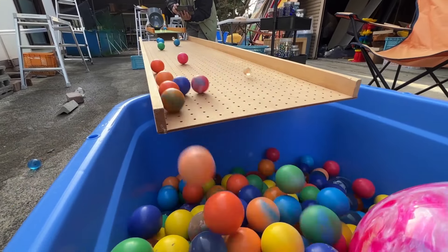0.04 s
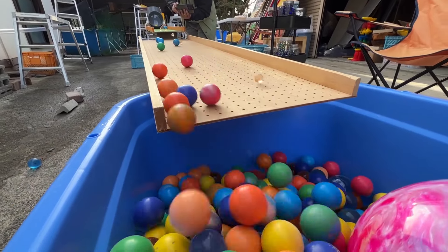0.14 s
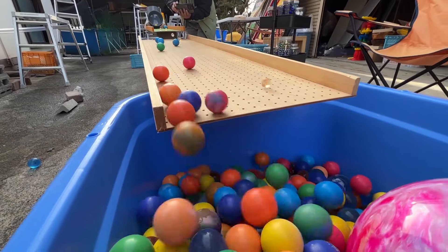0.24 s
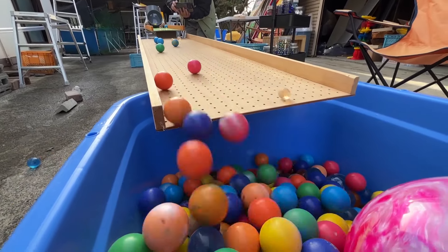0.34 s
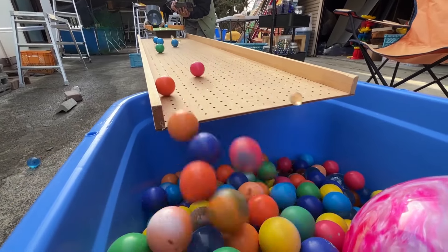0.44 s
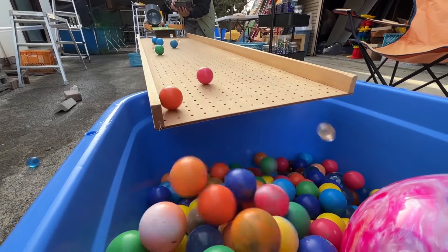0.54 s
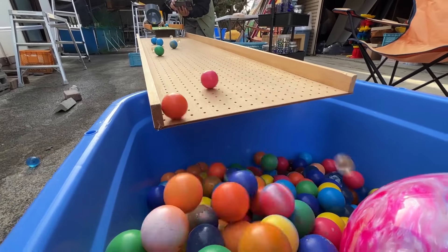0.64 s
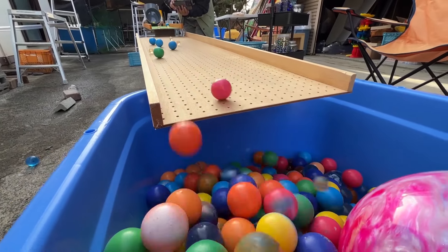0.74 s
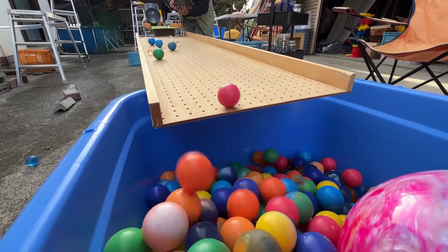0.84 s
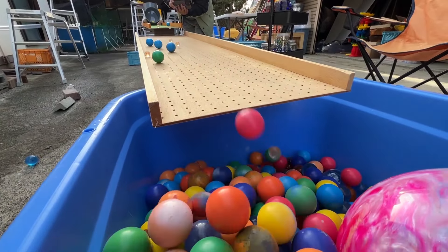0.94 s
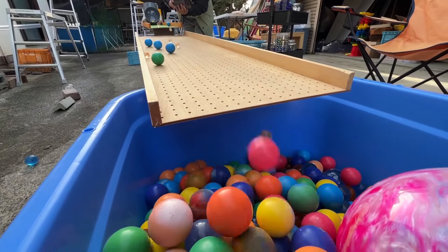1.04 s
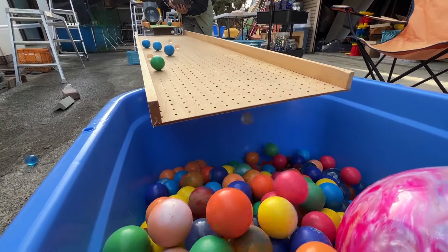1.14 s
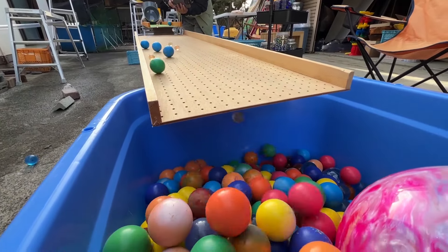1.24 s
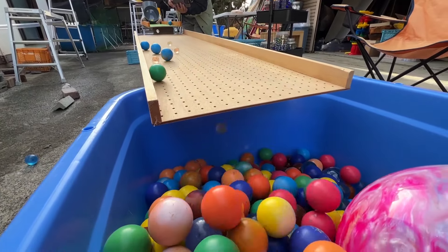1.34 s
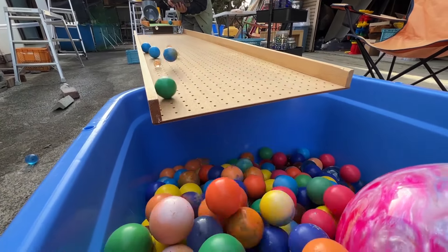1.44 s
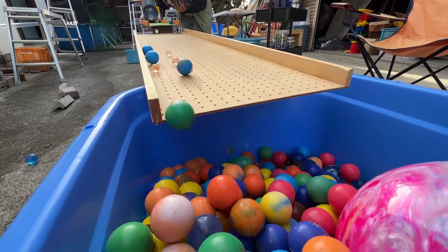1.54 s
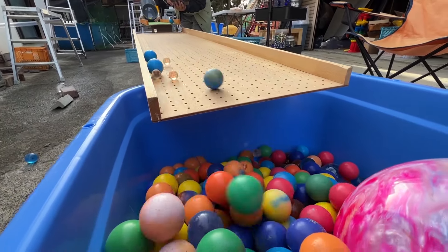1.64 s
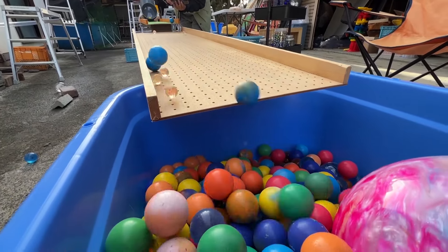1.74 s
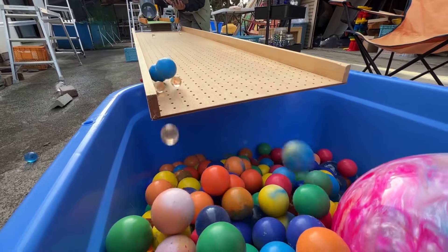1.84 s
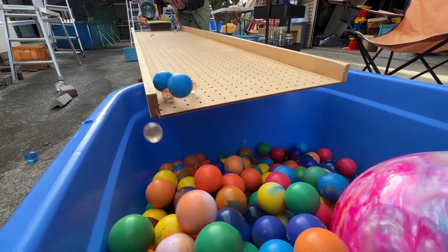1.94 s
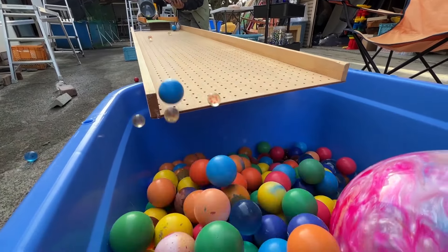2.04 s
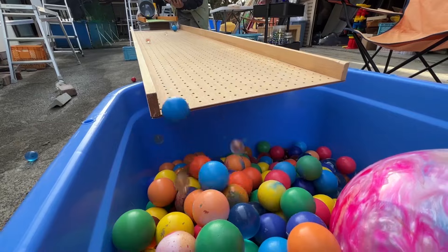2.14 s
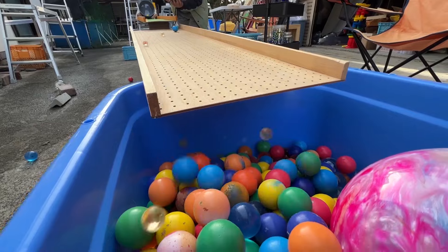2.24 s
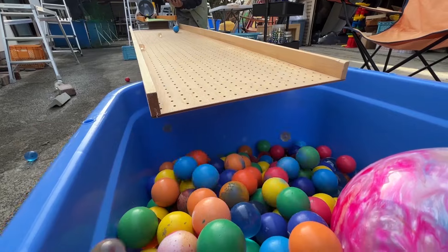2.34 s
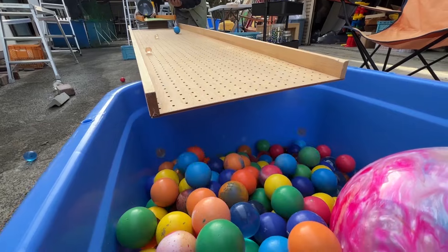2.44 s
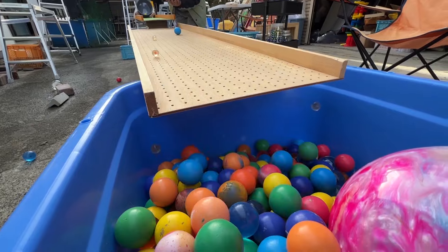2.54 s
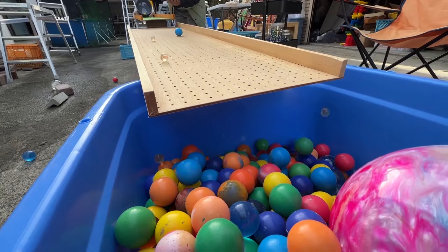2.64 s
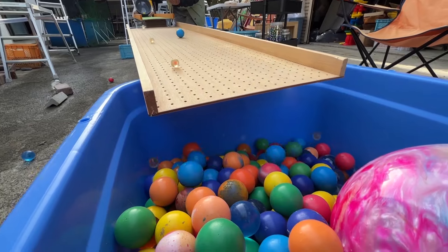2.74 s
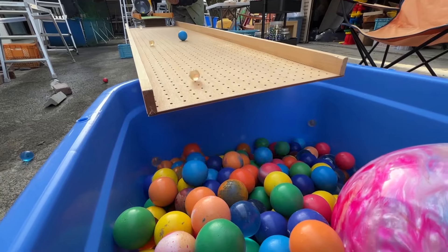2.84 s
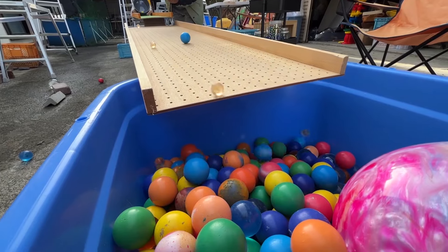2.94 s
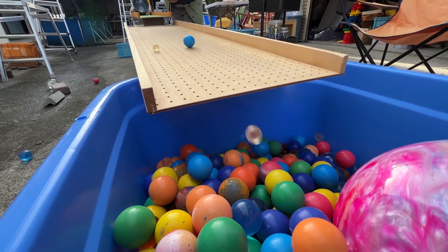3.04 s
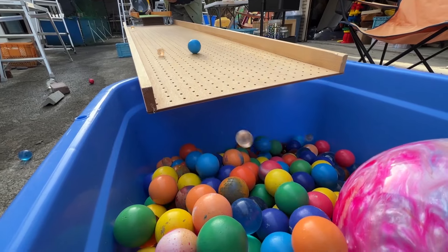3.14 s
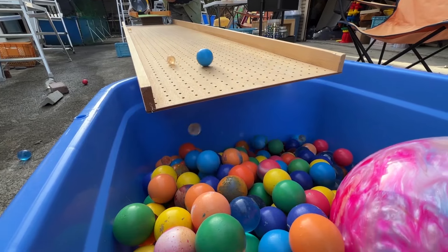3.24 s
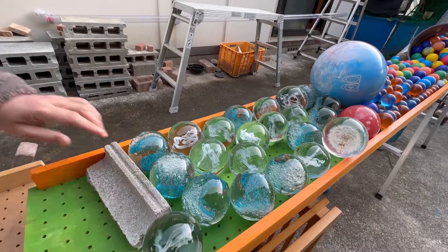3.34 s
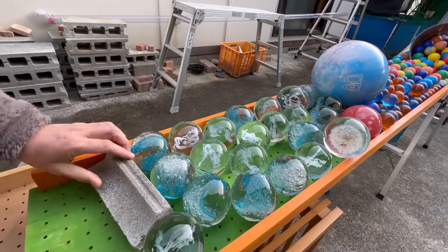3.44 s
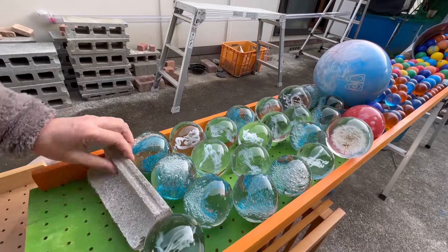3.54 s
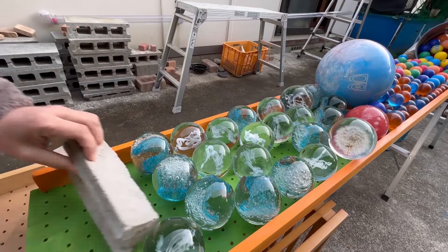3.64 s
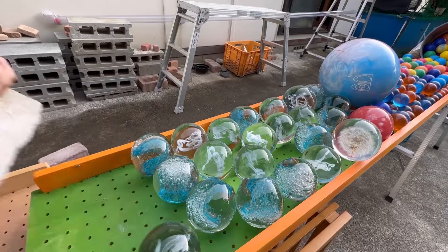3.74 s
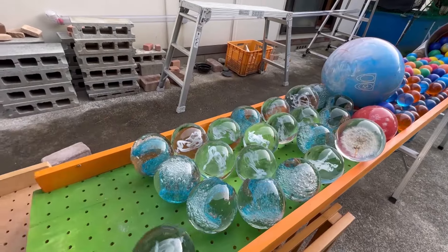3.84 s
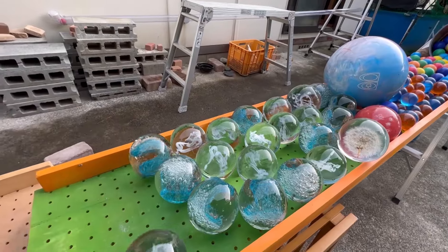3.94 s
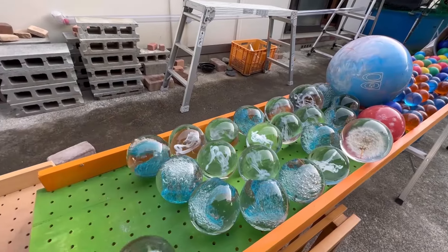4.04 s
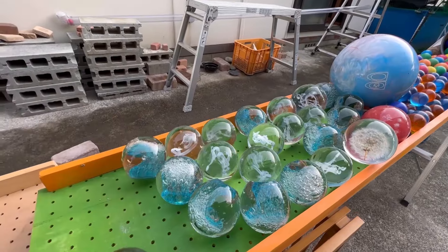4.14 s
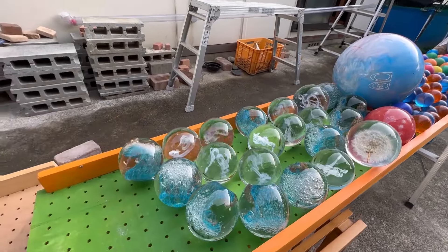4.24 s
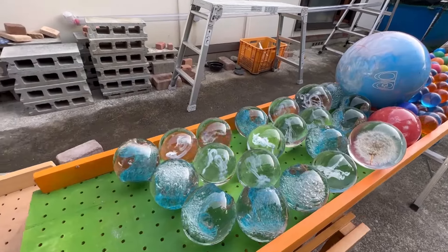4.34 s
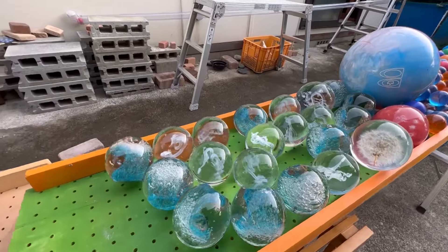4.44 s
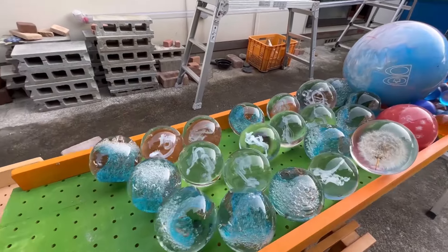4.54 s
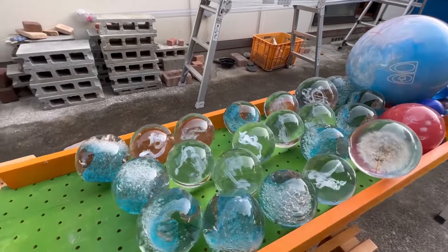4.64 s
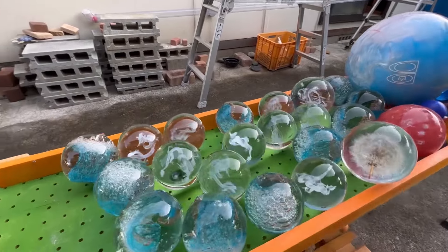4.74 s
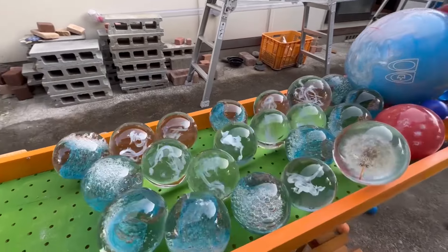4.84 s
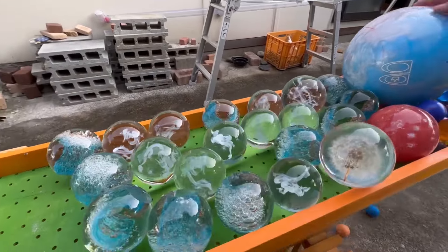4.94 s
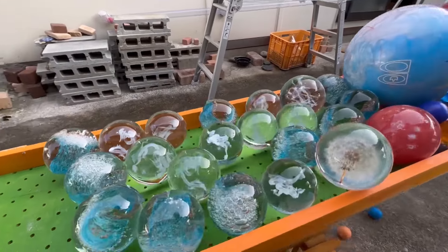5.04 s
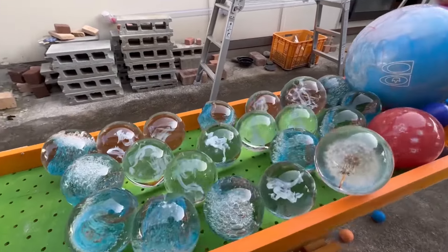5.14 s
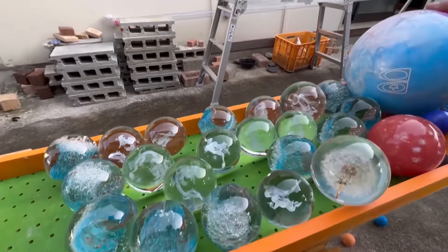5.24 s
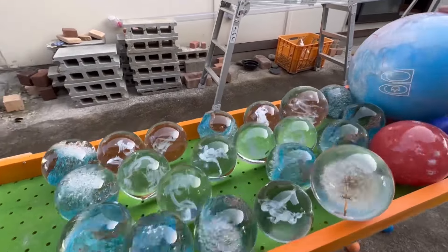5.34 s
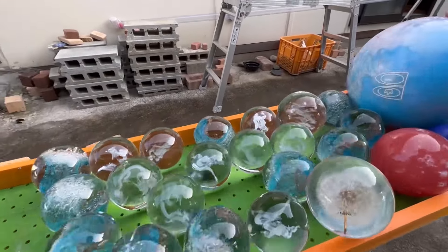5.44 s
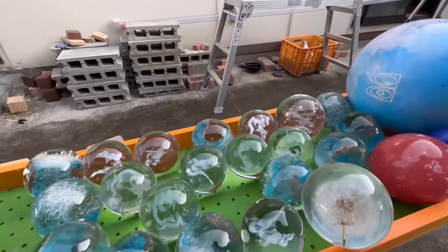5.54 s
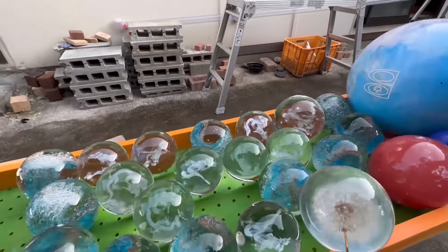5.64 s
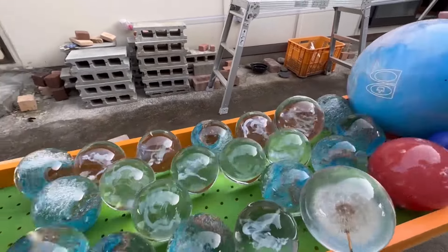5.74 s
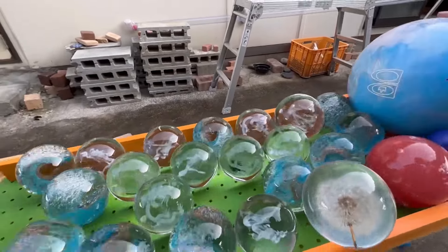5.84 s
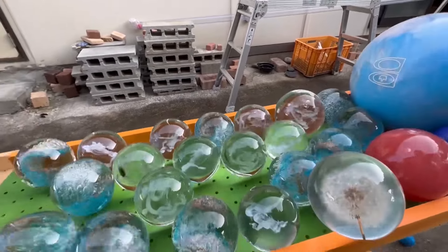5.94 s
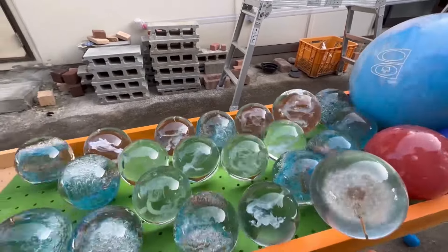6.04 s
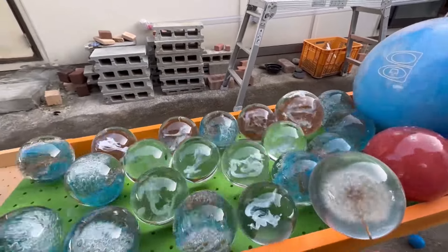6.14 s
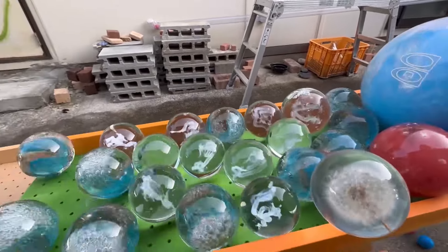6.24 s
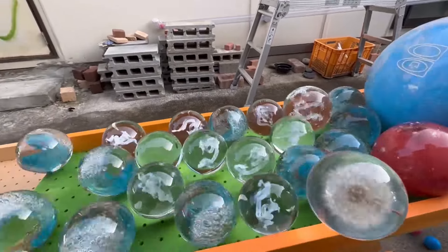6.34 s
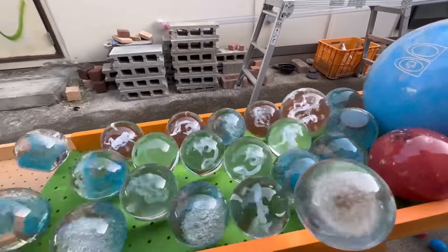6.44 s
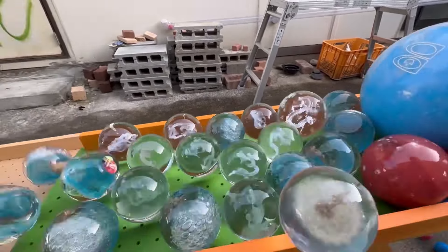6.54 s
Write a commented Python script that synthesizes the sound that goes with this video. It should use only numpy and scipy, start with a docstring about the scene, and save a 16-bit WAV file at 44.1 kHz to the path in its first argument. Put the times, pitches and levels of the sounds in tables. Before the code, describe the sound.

Close stereo microphone in an open yard. First, dense but muffled slow-motion knocks of balls falling into a plastic tub, with bassy handling rumble, thinning to separate duller clicks and thuds. Then a sudden change to a bright close view: a block drags and snaps away, glass squeaks briefly, a heavy thump follows, and glass balls clack and roll ever more densely.

```python
"""Hard balls knock together as they roll off a pegboard ramp and drop onto a heap in a plastic tub outdoors,
first strongly slowed down and dark, then less so; after a cut, close to the ramp, a block is pulled away and
heavy glass balls creak, knock, scuff and start to roll. Knocks, thuds and bright cracks are random contacts
through resonances; rolling is a rattle of pitched taps over a board drone and scuffing noise. Scrapes and
squeaks are dense slips that sing, and the microphone's shaking is low noise."""
import sys
import numpy as np
from scipy import signal
from scipy.fft import rfft, irfft, next_fast_len
from scipy.io import wavfile
from scipy.ndimage import uniform_filter1d

SR = 44100
rng = np.random.default_rng(int(sys.argv[2]) if len(sys.argv) > 2 else 0)


def master(y):
    """Save y as 16-bit WAV."""
    cut = np.clip(np.atleast_2d(y).T, -1, 1)
    pcm = np.round(cut * 32767)  # scale
    wavfile.write(sys.argv[1], SR, pcm.astype(np.int16))


def natural_amplitude(level_db):
    """Convert a level in decibels to a linear amplitude factor, elementwise."""
    exponent = np.asarray(level_db, float) / 20
    return 10 ** exponent


N = 290178
T = np.arange(N) / SR
CUTS_S = [1.43, 3.385]   # the two borders between the three parts
FROM_LEFT_S = (3.5, 5.5)   # sounds placed in time reach the left ear first between these times
EAR_LAG_S, WALL_LAG_S = 0.00045, 0.00018   # delay to the far ear: for the balls, for board and tub


def rms_one(x):
    """Scales a sound to rms 1."""
    return x / np.sqrt(np.mean(x ** 2) + 1e-20)


def peak_one(x):
    """Scales each side so that its loudest 3 ms reach rms 1."""
    power = uniform_filter1d(x ** 2, size=130)
    return x / np.sqrt(np.max(power, axis=-1, keepdims=True) + 1e-20)


def in_time(rows):
    """Draws straight lines between the rows of a table, giving each column sample by sample."""
    s, *columns = np.transpose(rows)
    return [np.interp(T, s, c) for c in columns]


def of_part(values, s):
    """Picks the value that holds in the part where time s lies."""
    return np.array(values)[np.searchsorted(CUTS_S, s)]


def panned(db):
    """Turns a left-right level difference into left and right gains."""
    return natural_amplitude(np.outer([.5, -.5], db))


def coloured(x, spectrum):
    """Filters x with a smooth curve over frequency, then scales it to rms 1."""
    size = next_fast_len(N)
    hz, db = np.transpose(spectrum)
    log_hz = np.log(np.arange(size // 2 + 1) * SR / size + 1)
    gain = natural_amplitude(np.interp(log_hz, np.log(hz + 1), db))
    return rms_one(irfft(rfft(x, size) * gain, size)[..., :N])


def by_part(x, spectra):
    """Gives each of the three parts its own colour."""
    part = np.searchsorted(CUTS_S, T)
    return sum((part == k) * coloured(x, spectrum) for k, spectrum in enumerate(spectra))


def drift(rate_hz):
    """Makes a slow random wander of rms 1 by smoothing noise."""
    r = np.exp(-2 * np.pi * rate_hz / SR)
    noise = rng.standard_normal(N + SR)
    return rms_one(signal.lfilter([1], [1, -2 * r, r * r], noise)[SR:])   # drops the first second


def grains(shape, s, per_s, spread_db, alike, first=0., lag_s=EAR_LAG_S):
    """Random contacts, a firm one first if asked; the far ear hears a share of the near one's a little later."""
    size = natural_amplitude(spread_db * np.minimum(rng.exponential(1, (2, *shape)), 5))
    sign = rng.choice([-1, 1], size.shape)
    near, other = size * sign * (rng.random(size.shape) < per_s / SR)
    alike = np.clip(alike, 0, 1)
    lag = round(lag_s * SR)
    far = np.sqrt(alike) * np.roll(near, lag, axis=-1) + np.sqrt(1 - alike) * other
    start = round(.002 * SR)
    near[..., start] += first
    far[..., start + lag] += first
    from_left = (s > FROM_LEFT_S[0]) & (s < FROM_LEFT_S[1])
    return np.stack([np.where(from_left, near, far), np.where(from_left, far, near)], axis=-2)


def resonance(x, hz, width):
    """Rings at one pitch: a two-pole band with gain 1 on top."""
    r = np.exp(-np.pi * width / SR)
    return signal.lfilter([1 - r, 0, r - 1], [1, -2 * r * np.cos(2 * np.pi * hz / SR), r * r], x)


def blow(t60, rise_s, tail_db, stretch, count):
    """Envelope of a blow: quick rise, decay, and a longer tail from the yard and the jostled heap."""
    t, t60 = np.arange(count) / SR, max(t60, .005)
    decay = natural_amplitude(-60 * t / t60)
    tail = natural_amplitude(tail_db - 60 * t / (t60 * stretch))
    return (1 - np.exp(-t / rise_s)) * (decay + tail)


def held(s, length, rise_s, fall_s):
    """Envelope that rises from time s, stays up until its length is over and dies away."""
    rise = np.clip((T - s) / max(rise_s, .001), 0, 1)
    return rise * np.exp(-np.maximum(T - s - length, 0) / max(fall_s, .001))


def add(out, s, piece):
    """Mixes a piece in at time s."""
    i = max(round(s * SR), 0)
    out[:, i:i + piece.shape[1]] += piece[:, :N - i]


# low shaking of the microphone: (time [s], level [dB])
SHAKING = [(0, -34), (1.3, -44), (2.3, -45.5), (2.5, -73), (3.36, -58), (3.39, -32), (3.7, -36.5),
           (4.0, -45.5), (4.75, -48.5), (5.1, -38), (6.0, -49.5), (6.58, -54)]
# jolts on top of it: (time [s], level [dB])
JOLTS = [(.03, -42), (.16, -40), (.35, -30), (.66, -33.5), (.79, -38), (.9, -56), (1.39, -43), (1.47, -46),
         (1.74, -53), (2.02, -31), (3.41, -35.5), (3.48, -32), (3.63, -29), (3.88, -47), (4.32, -53),
         (4.51, -38), (4.821, -31), (5.15, -31), (5.95, -43), (6.49, -45)]
# colour of the shaking: (frequency [Hz], relative level [dB])
SHAKING_COLOUR = [(12, -44), (20, -3.5), (86, 9.5), (130, 6), (170, 4.5), (290, -120)]


def rumble():
    """Low shaking is lumpy noise with brief jolts, most alike at the two ears in the last part."""
    alike = of_part([.6, .1, .97], T)
    mid, side = coloured(rng.standard_normal((2, N)), SHAKING_COLOUR)
    level = natural_amplitude(in_time(SHAKING)[0] + 2.0 * drift(6.0))
    for s, db in JOLTS:
        level = level + natural_amplitude(db) * np.exp(-((T - s) / 0.03) ** 2)
    return level * (mid + np.sqrt((1 - alike) / (1 + alike)) * side * [[1], [-1]])


# how much is rolling, and where: (time [s], relative level [dB], left-right difference [dB])
MOTION = [(0.0, -32, 4), (0.11, -37, 1.5), (0.55, -35.5, 1.5), (0.68, -42, 1.5), (1.23, -47, 0),
          (1.96, -47.5, 2), (2.14, -41, 1), (2.36, -46, 0.5), (2.53, -55.5, 2), (3.08, -44.5, 0.5),
          (3.43, -63, -0.5), (3.57, -43.5, 0.5), (3.85, -51, 0.5), (4.12, -46, 1), (4.29, -41.5, 1.5),
          (4.58, -47.5, 0), (4.67, -38, 4), (4.76, -49.5, -3), (4.8, -41.5, 1.5), (4.99, -29, 4),
          (5.09, -38, 5), (5.19, -69, 0), (5.22, -35.5, -3.5), (5.39, -31, -4), (5.44, -24, 0),
          (5.59, -39, -4.5), (5.62, -27.5, 0.5), (5.75, -38, -6.5), (5.94, -31, -0.5), (5.97, -31, -5),
          (6.01, -22.5, -2.5), (6.14, -22, -4.5), (6.3, -24, -4.5), (6.4, -31, -2.5), (6.45, -20, -5),
          (6.58, -25, -4)]
# board and tub at the two ears: (time [s], likeness [0-1], left-right difference [dB])
WALLS = [(0, 0.05, 2.5), (2.2, 0.06, 3), (2.5, 0.91, 1), (3.4, 1, 1), (4.7, 1, -3), (5.0, 0.42, -2.5),
         (6.58, 0.17, -4.5)]
# resonances of board and tub walls: (frequency [Hz], width [Hz], relative level [dB])
WALL_RESONANCES = [(216, 94, 6), (300, 67, -1.5), (410, 85, -27), (140, 19, -19)]
# a heavy load runs over the board: (time [s], length [s], relative level [dB])
LOADS = [(0.0, 0.038, -32), (0.284, 0.033, -33.5), (0.51, 0.15, -39), (3.379, 0.068, -30),
         (2.138, 0.17, -69), (3.206, 0.15, -43), (4.843, 0.19, -28), (5.035, 0.072, -29),
         (5.17, 0.072, -32), (5.38, 0.028, -53), (6.0, 0.2, -53), (6.45, 0.074, -37)]
ROLL_PIVOT_DB = -45   # drone and scuffing follow the rolling up and down around this level


def board_drone(clump):
    """Rolling and heavy loads knead the board and tub walls, whose resonances drone along."""
    roll_db, _ = in_time(MOTION)
    level = natural_amplitude(of_part([-42.5, -39.5, -45], T) + 0.43 * (roll_db - ROLL_PIVOT_DB))
    for s, length, db in LOADS:
        level = level + natural_amplitude(db) * held(s, length, rise_s=0.021, fall_s=0.028)
    alike, pan_db = in_time(WALLS)
    knead = grains((N,), 0, per_s=1200.0, spread_db=4.0, alike=alike, lag_s=WALL_LAG_S)
    knead = panned(pan_db) * knead
    drone = 0
    for hz, width, db in WALL_RESONANCES:
        drone = drone + natural_amplitude(db) * rms_one(resonance(resonance(knead, hz, width), hz, 3.37 * width))
    return rms_one(drone) * level * natural_amplitude(0.82 * clump)


# colour of scuffing in each of the three parts: (frequency [Hz], relative level [dB])
SCUFF_COLOURS = [
    [(1760, 7), (3000, 7), (3390, 0), (4280, 0.5), (4940, -13.5), (5780, 0.5), (6950, -15.5), (7740, 0.5),
     (8490, -13), (9450, -51), (16500, -61)],
    [(1760, 3.5), (3000, -3.5), (4280, -19), (6520, -19), (7360, -26), (8990, -18.5), (10800, -31),
     (12800, -24), (16500, -47)],
    [(1760, -6), (3000, 2.5), (3390, 0), (3740, -5.5), (5620, -1), (7100, -5), (9790, -5.5), (10900, -6.5),
     (11400, -20), (13000, -31), (13800, -16), (15200, -11), (16000, -23), (16500, -44)],
]


def scuffing(clump):
    """Surfaces rub: very dense fine contacts make a rough noise that follows the rolling."""
    roll_db, pan_db = in_time(MOTION)
    level_db = of_part([-67.5, -53.5, -47.5], T) + 0.25 * (roll_db - ROLL_PIVOT_DB)
    level_db = level_db + 0.2 * clump + 0.29 * drift(60.0) - 3.5
    contacts = grains((N,), T, per_s=12000.0, spread_db=4.0, alike=0.023)
    return panned(pan_db) * by_part(contacts, SCUFF_COLOURS) * natural_amplitude(level_db)


# colour of rolling in each of the three parts: (frequency [Hz], relative level [dB])
ROLL_COLOURS = [
    [(240, -29), (400, 15), (540, 12), (965, 3.5), (1410, 0.5), (1870, -14.5), (2300, -20), (3500, -31),
     (4550, -23.5), (7700, -120)],
    [(240, -16), (400, 16.5), (497, 18), (560, 6.5), (1100, 9.5), (1520, -3), (2240, -15), (3500, -56),
     (4550, -105), (7700, -120)],
    [(240, -41), (400, 0.5), (939, 4.5), (1220, -2), (1350, 1.5), (1890, -2.5), (2070, -10), (2500, -14),
     (3500, -20), (4550, -17.5), (7700, -120)],
]


def rolling(clump):
    """Balls rattle over the holes: clumps of short taps, each ringing at one of fourteen pitches."""
    roll_db, pan_db = in_time(MOTION)
    taps = grains((N,), T, per_s=4500.0, spread_db=3.0, alike=0.77)
    dealt = rng.integers(0, 14, N // 32 + 1)[np.arange(N) // 32]   # a pitch is drawn every 32 samples
    rattle = 0
    for k, hz in enumerate(np.geomspace(450, 3400, 14)):
        ring = resonance(taps * (dealt == k) + 1e-18, hz, 0.2 * hz)
        rattle = rattle + rms_one(ring) * np.sqrt(hz)
    return panned(pan_db) * by_part(rattle, ROLL_COLOURS) * natural_amplitude(roll_db + 2.6 * clump + 2.5)


# brief thin squeaks of glass under load: (time [s], length [s], level [dB], pitch [Hz])
SQUEAKS = [(3.6, 0.012, -33, 5370), (3.643, .02, -48, 5830), (3.61, .012, -44, 4400),
           (3.767, 0.012, -46.5, 5800), (4.23, 0.004, -20.5, 5570), (4.235, 0.0055, -15, 3300),
           (4.266, .01, -35, 5460), (4.404, 0.008, -44, 3700), (4.402, 0.012, -44, 5600),
           (4.435, 0.012, -38.5, 5550), (5.667, 0.0076, -16.5, 1682), (5.668, 0.017, -32, 3000),
           (5.674, .01, -24.5, 8300), (5.841, 0.012, -31.5, 3300), (5.842, 0.011, -29, 2940),
           (5.836, 0.016, -33.5, 5440), (5.843, .008, -37, 6600), (5.86, 0.012, -30, 4780),
           (5.876, 0.0069, -38, 4200), (5.865, .018, -38, 5880), (5.69, .015, -35, 1500),
           (4.307, .006, -37.5, 8350), (4.437, .01, -42, 4060), (7, .02, -24, 2120),
           (6.07, 0.0028, -11, 1900), (6.082, 0.04, -23, 2200)]


def squeaks():
    """Fast, nearly regular slips make a wavering tone; stray slips ring a narrow resonance at its pitch."""
    slips = grains((N,), T, per_s=7300.0, spread_db=1.0, alike=0.15)
    wavering_time = np.cumsum(1 + .006 * drift(52.0)) / SR
    out = np.zeros((2, N))
    for s, length, db, hz in SQUEAKS:
        width = 0.021 * hz
        stray = rms_one(resonance(resonance(slips, hz, width), hz, 2 * width))
        tone = np.sin(2 * np.pi * hz * wavering_time + [[0], [1]])   # a radian apart at the two ears
        out += natural_amplitude(db) * held(s, length, rise_s=0.0019, fall_s=0.01) * (tone + .5 * stray)
    return out


# sliding strokes: (time [s], length [s], relative level [dB], 0 block or 1 glass, singing over rasp [dB])
STROKES = [(3.588, 0.065, -30, 0, -3), (3.686, 0.002, -11.5, 0, 2), (4.219, 0.014, -19, 0, -8),
           (4.244, 0.045, -22.5, 0, 11.5), (4.35, 0.13, -37, 0, -5), (4.573, 0.16, -38.5, 1, -3),
           (4.619, 0.072, -43, 0, 8), (5.348, 0.11, -46.5, 1, 11), (5.646, 0.07, -19.5, 1, -8),
           (5.834, 0.06, -17, 1, -3), (6.016, 0.142, -30, 1, -3)]
# what sings when glass slides: (frequency [Hz], width [Hz], relative level [dB])
GLASS = [(4870, 61, -8), (5900, 74, -16), (6600, 68, -15), (8030, 160, -13), (8700, 62, -25),
         (9300, 460, -5)]
# what sings when the block drags: (frequency [Hz], width [Hz], relative level [dB])
BLOCK = [(1500, 650, 2), (2050, 530, 13), (2620, 790, 9.5), (3300, 390, 6.5), (5460, 120, -9),
         (6460, 45, -19), (6640, 44, -5), (8250, 120, -31)]


def scrapes():
    """The block drags and glass slides on glass: dense slips sing in flickering resonances over friction noise."""
    slips = grains((N,), T, per_s=9000.0, spread_db=2.5, alike=0.069)
    friction = natural_amplitude(2.5) * coloured(slips, SCUFF_COLOURS[2])
    out = np.zeros((2, N))
    for s, length, db, glass, sing_db in STROKES:
        is_glass = glass > .5
        flicker_db = 5 if is_glass else 3
        a, b = round(s * SR), round((s + .25) * SR)
        singing = 0
        for hz, width, mode_db in (GLASS if is_glass else BLOCK):
            mode = rms_one(resonance(resonance(slips[:, a:b], hz, width), hz, 3 * width))
            singing = singing + natural_amplitude(mode_db + flicker_db * drift(24.0)[a:b]) * mode
        stroke = natural_amplitude(sing_db) * rms_one(singing) + friction[:, a:b]
        envelope = held(s, length, rise_s=0.004, fall_s=0.021)[a:b]
        out[:, a:b] += natural_amplitude(db - 13.0) * envelope * stroke
    return out


# tub and board take the blow: (time [s], relative level [dB], pitch [Hz], main decay by 60 dB [s])
THUDS = [(0.031, -23, 127, 0.065), (0.086, -13, 101, 0.16), (0.208, -23, 132, 0.068),
         (0.327, -16, 114, 0.06), (0.397, -20.5, 91.5, 0.081), (0.765, -22.5, 140, 0.085),
         (0.884, -22.5, 515, 0.061), (0.9, -20, 114, 0.049), (0.978, -24, 412, 0.16),
         (0.988, -22.5, 470, 0.063), (1.128, -28, 203, 0.064), (1.145, -28, 467, 0.03),
         (1.33, -18.5, 104, 0.21), (1.586, -18, 238, 0.067), (1.683, -21.5, 223, 0.27),
         (1.847, -34.5, 179, 0.15), (1.901, -24, 300, 0.36), (1.963, -20.5, 215, 0.19),
         (1.995, -21, 300, 0.13), (2.123, -23, 248, 0.33), (2.323, -22, 254, 0.1), (2.567, -27.5, 396, 0.1),
         (2.658, -26, 265, 0.085), (2.716, -21, 288, 0.035), (2.745, -26, 260, 0.094),
         (2.817, -28, 310, 0.11), (2.927, -18.5, 244, 0.15), (3.08, -29, 218, 0.055), (3.14, -19, 282, 0.1),
         (3.189, -25.5, 270, 0.056), (3.264, -30.5, 236, 0.22), (3.328, -25.5, 280, 0.32),
         (3.393, -46, 127, 0.16), (3.459, -28.5, 118, 0.13), (3.597, -25, 188, 0.19),
         (3.69, -14.5, 426, 0.094), (4.231, -15, 420, 0.057), (4.358, -36, 118, 0.1),
         (4.316, -32.5, 151, 0.09), (4.471, -24, 146, 0.032), (4.505, -31.5, 118, 0.092),
         (4.615, -31, 376, 0.35), (4.664, -30, 383, 0.16), (4.812, -18, 229, .04), (4.821, -4, 182, 0.03),
         (4.912, -18, 188, 0.34), (4.955, -12, 211, 0.091), (4.966, -13, 240, .05),
         (4.983, -13, 206, 0.056), (5.029, -13, 170, 0.27), (5.044, -17, 326, 0.064), (5.1, -19, 300, .05),
         (5.062, -15, 197, 0.061), (5.118, -14.5, 193, 0.23), (5.342, -28, 480, 0.099),
         (5.595, -20, 480, 0.18), (5.759, -14.5, 476, 0.063), (5.884, -31.5, 141, 0.12),
         (5.996, -19.5, 494, 0.095), (6.035, -37, 245, 0.13), (6.144, -16.5, 295, 0.29),
         (6.29, -14, 260, 0.059), (6.409, -24, 350, 0.12), (6.481, -16.5, 314, 0.097),
         (6.517, -11, 300, 0.034)]


def thuds(count=9000):
    """The walls flex: a soft push, then an uneven low ring."""
    out = np.zeros((2, N))
    at = (np.array(THUDS)[:, :1] * SR).astype(int)
    alike, pan_db = np.array(in_time(WALLS))[:, at]
    pushes = grains((len(THUDS), count), 0, first=5.8, per_s=850.0, spread_db=2.5, alike=alike,
                    lag_s=WALL_LAG_S)
    pushes = pushes * panned(pan_db).T[..., None]
    for (s, db, hz, t60), push in zip(THUDS, pushes):
        push = push * blow(t60, rise_s=0.0047, tail_db=-24.5, stretch=8.2, count=count)
        ring = resonance(resonance(push, hz, 0.29 * hz), hz, 2.77 * hz)
        add(out, s - .002, natural_amplitude(db + 1.5) * ring / np.max(np.abs(ring)))
    return out


# bright edge of a hit: (time [s], relative level [dB], pitch [Hz], main decay by 60 dB [s])
CRACKS = [(0.0234, -29.5, 3980, 0.065), (0.0867, -24.5, 4200, 0.027), (0.3197, -28.5, 4200, 0.053),
          (0.3966, -34, 6100, 0.012), (0.432, -40, 4000, 0.049), (0.537, -42, 5700, 0.16),
          (0.6314, -37.5, 3620, 0.041), (0.6717, -40, 4120, 0.026), (0.7637, -38, 3700, 0.027),
          (0.8823, -42.5, 4100, 0.053), (0.989, -44.5, 5750, 0.012), (1.1234, -50, 4170, 0.04),
          (1.325, -41.5, 4030, 0.076), (1.4618, -35.5, 3670, 0.14), (1.5362, -29, 3530, 0.0083),
          (1.576, -30, 4970, 0.048), (1.617, -38.5, 3600, 0.034), (1.683, -17.5, 3730, 0.032),
          (1.7719, -41, 3560, 0.037), (1.853, -35, 3340, 0.013), (1.914, -45, 4800, 0.037),
          (1.929, -19.5, 4160, 0.019), (1.9578, -29, 3500, 0.027), (1.994, -39, 4300, 0.063),
          (2.0547, -54, 3550, 0.04), (2.0752, -40, 3670, 0.04), (2.0996, -38, 3500, 0.04),
          (2.1158, -16, 3700, 0.025), (2.1437, -25.5, 4900, 0.047), (2.2438, -38, 3800, 0.099),
          (2.322, -28.5, 3880, 0.027), (2.338, -34, 3300, 0.036), (2.454, -55, 3500, 0.035),
          (2.513, -40, 3640, 0.021), (2.5486, -51, 3740, 0.04), (2.589, -36, 3800, 0.021),
          (2.615, -27.5, 4230, 0.023), (2.6574, -53, 3540, 0.04), (2.6948, -38, 3610, 0.027),
          (2.7176, -28, 4970, 0.016), (2.8916, -31.5, 3750, 0.074), (2.928, -24.5, 3280, 0.016),
          (3.1413, -42, 3960, 0.04), (3.193, -27.5, 3640, 0.025), (3.327, -30, 3900, 0.02),
          (3.555, -44, 4100, 0.055), (3.6044, -24.5, 5700, 0.048), (3.6366, -33, 5930, 0.056),
          (3.665, -28, 4100, 0.011), (3.692, -8.5, 7540, 0.022), (4.1579, -45, 4400, 0.04),
          (4.1744, -47, 3960, 0.04), (4.2378, -6.5, 2790, 0.019), (4.3075, -32, 7800, 0.03),
          (4.3834, -35, 3920, 0.056), (4.4039, -39, 5580, 0.036), (4.443, -33, 9000, 0.056),
          (4.496, -37.5, 4000, 0.065), (4.512, -34.5, 10000, 0.062), (4.5282, -36, 9700, 0.23),
          (4.617, -37, 8780, 0.16), (4.8106, -13.5, 3920, 0.046), (4.826, -19.5, 4600, 0.051),
          (4.84, -32, 5500, 0.03), (4.853, -34, 5000, 0.03), (4.8696, -22.5, 5200, 0.058),
          (4.884, -38, 5450, 0.034), (4.916, -33, 5200, 0.11), (4.955, -17, 4600, 0.048),
          (4.996, -37, 4600, 0.04), (5.0394, -34, 4330, 0.063), (5.055, -28, 4700, 0.053),
          (5.1228, -42, 4620, 0.033), (5.188, -32.5, 9400, 0.04), (5.237, -30.5, 6600, 0.083),
          (5.2919, -35, 4050, 0.039), (5.3477, -35, 4390, 0.036), (5.4166, -24.5, 6840, 0.014),
          (5.4765, -37, 9290, 0.034), (5.5018, -31, 9100, 0.022), (5.5453, -42, 6680, 0.073),
          (5.624, -32, 3000, 0.02), (5.636, -27.5, 9400, 0.021), (5.647, -19, 9800, 0.024),
          (5.659, -17, 9900, 0.023), (5.6755, -21, 8700, 0.062), (5.787, -27, 8350, 0.02),
          (5.823, -35, 7000, 0.02), (5.8383, -36, 6070, 0.04), (5.9282, -21, 9800, 0.034),
          (5.982, -30, 4170, 0.036), (6.0363, -38, 4600, 0.04), (6.058, -28.5, 9300, 0.03),
          (6.0721, -31, 4340, 0.068), (6.1469, -23, 3940, 0.077), (6.1857, -24.5, 3860, 0.098),
          (6.224, -36, 3900, 0.04), (6.286, -18.5, 4270, 0.035), (6.4111, -18, 4300, 0.019),
          (6.4482, -32, 3820, 0.05), (6.475, -18.5, 4070, 0.067)]
# extra left-right difference of lower, then higher cracks: (part 1 [dB], part 2 [dB], part 3 [dB])
CRACK_LEAN_DB = [
    [-2, -0.2, 5],
    [-2, -3, 0.5],
]


def cracks(count=7000):
    """The bright edge of a hit: a burst of fine contacts, tilted toward its own pitch."""
    out = np.zeros((2, N))
    fine = by_part(grains((N,), T, per_s=11000.0, spread_db=3.5, alike=0.013), SCUFF_COLOURS)
    fine = np.pad(fine, ((0, 0), (0, count)))
    motion_s, _, motion_pan_db = np.transpose(MOTION)
    for s, db, hz, t60 in CRACKS:
        is_high = int(hz > 7000)
        pan_db = np.interp(s, motion_s, motion_pan_db) + of_part(CRACK_LEAN_DB[is_high], s)
        i = round(s * SR)
        burst = fine[:, i:i + count] * blow(t60, rise_s=0.001, tail_db=-13.5, stretch=5.3, count=count)
        burst = natural_amplitude(-26.0) * burst + resonance(burst, hz, 0.52 * hz)
        note = peak_one(resonance(burst, hz, 0.027 * hz))   # small glass parts ring briefly
        burst = peak_one(burst) + natural_amplitude(of_part([-25, -29, -13.5], s)) * note
        add(out, s - .0015, natural_amplitude(db - 4.5) * panned([pan_db]) * peak_one(burst))
    return out


# ball on ball: (time [s], relative ring level [dB], ring pitch [Hz], clack level trim against the ring [dB],
# main decay by 60 dB [s])
KNOCKS = [(0.024, -8.5, 900, -7.5, 0.028), (0.053, -23.5, 1090, -31, 0.029), (0.084, -19.5, 1060, -9, 0.14),
          (0.107, -25, 1410, -19, 0.024), (0.116, -34, 1530, -12, 0.026), (0.156, -22.5, 815, -32, 0.026),
          (0.199, -23.5, 890, -19, 0.028), (0.218, -31, 1400, -10, 0.03), (0.24, -34.5, 1100, -25, 0.04),
          (0.267, -30, 832, -10.5, 0.087), (0.284, -33, 1200, -18, 0.032), (0.319, -25, 1190, -14, 0.2),
          (0.367, -22, 1560, -13, 0.017), (0.399, -9.5, 1330, -41, 0.018), (0.436, -22, 1400, -15, 0.03),
          (0.445, -17.5, 1010, -15, 0.019), (0.475, -33, 1110, -1, 0.021), (0.509, -28, 1360, -11, 0.044),
          (0.536, -18.5, 1290, -18, 0.11), (0.549, -26, 1390, -8, 0.048), (0.56, -29, 1570, -12, 0.046),
          (0.573, -31, 1400, -13, 0.064), (0.614, -22.5, 1240, -4.5, 0.088), (0.631, -23, 844, -18, 0.052),
          (0.659, -23, 710, -8, 0.05), (0.672, -22, 790, -27, 0.027), (0.691, -36, 1560, -18, 0.017),
          (0.75, -31, 1060, -13, 0.055), (0.766, -25.5, 840, -1, 0.033), (0.83, -36, 1070, -21, 0.024),
          (0.865, -29.5, 1100, -2, 0.058), (0.887, -25, 990, -1.5, 0.046), (0.916, -27, 1050, -27, 0.043),
          (0.9162, -27, 1590, -30, 0.029), (0.979, -26, 1000, -11, .03), (0.993, -21.5, 1310, -16, 0.033),
          (1.045, -37, 1200, -12, 0.04), (1.125, -21.5, 1160, -2.5, 0.032), (1.141, -33, 900, -10, 0.027),
          (1.208, -33, 705, -30, 0.029), (1.284, -28.5, 1290, -7, 0.11), (1.305, -29.5, 740, -7, 0.12),
          (1.373, -29, 706, -5, 0.074), (1.486, -27.5, 985, -2.5, 0.021), (1.512, -30.5, 970, -17, 0.054),
          (1.577, -23.5, 1100, -25, 0.076), (1.683, -18.5, 1270, -8, 0.058), (1.749, -36, 982, -11, 0.04),
          (1.772, -31, 1010, 6.5, 0.027), (1.811, -30, 970, 0.5, 0.011), (1.855, -30.5, 1650, 6.5, 0.012),
          (1.912, -35, 996, 3, 0.025), (1.933, -25, 1120, 10, 0.039), (1.957, -25, 980, -2, 0.064),
          (2.008, -29.5, 1900, 2, 0.04), (2.028, -26.5, 1220, -9, 0.025), (2.055, -33.5, 950, 3, 0.035),
          (2.098, -29, 970, 5, 0.021), (2.114, -21.5, 990, 12.5, 0.011), (2.145, -22, 675, -24, 0.036),
          (2.173, -26.5, 1120, 1.5, 0.037), (2.208, -28, 900, -3, 0.024), (2.321, -22.5, 900, 3, 0.04),
          (2.323, -19.5, 1046, -19, 0.027), (2.338, -24.5, 1090, -1, 0.032), (2.378, -29, 1440, -8, 0.024),
          (2.425, -40.5, 711, 1, 0.052), (2.454, -40, 1300, 1, 0.032), (2.484, -35, 690, -8, 0.04),
          (2.514, -28.5, 770, -3, 0.03), (2.55, -28.5, 1580, -1, 0.051), (2.587, -24.5, 900, 5, 0.032),
          (2.615, -32, 750, -6, 0.066), (2.659, -25.5, 1630, 0.5, 0.039), (2.695, -36, 869, 3, 0.028),
          (2.716, -23.5, 1040, -16, 0.033), (2.753, -31, 885, -25, 0.019), (2.812, -32, 1720, -3.5, 0.034),
          (2.82, -24.5, 865, -7, 0.016), (2.838, -38, 1300, 3, 0.017), (2.892, -30, 1620, -8, 0.069),
          (2.906, -24, 950, 0, 0.011), (2.927, -18.5, 770, -13, 0.06), (3.022, -28.5, 1070, 1, 0.03),
          (3.054, -33, 1270, -4, 0.03), (3.142, -27, 690, -12, 0.069), (3.16, -28, 1190, -4.5, 0.02),
          (3.176, -45, 1200, -1, 0.021), (3.195, -25.5, 1090, -12, 0.038), (3.254, -39, 1200, -6, 0.025),
          (3.327, -22, 1000, 1, 0.025), (3.382, -27.5, 940, -15, 0.21), (3.454, -25.5, 1110, -16, 0.043),
          (3.493, -27.5, 1020, -24, 0.016), (3.56, -35, 1190, 6, 0.037), (3.57, -27.5, 1380, 0, 0.37),
          (3.6, -20.5, 730, 13.5, 0.041), (3.601, -14, 1370, 2, 0.12), (3.654, -20.5, 1250, -5, 0.081),
          (3.666, -25, 2200, -5, 0.018), (3.692, -4.5, 1285, -4, 0.035), (3.708, -17, 1140, -12, 0.11),
          (3.844, -28, 930, -3.5, 0.089), (3.863, -34, 1720, -7, 0.03), (4.113, -26.5, 1400, 1, 0.016),
          (4.179, -27.5, 850, 0, 0.056), (4.2225, -19, 1900, -7, 0.053), (4.231, -12.5, 1110, 8, 0.068),
          (4.2367, -10, 1730, 2, 0.061), (4.384, -25, 1360, -8, 0.088), (4.51, -22.5, 1480, -23, 0.064),
          (4.54, -26, 835, -20, 0.039), (4.614, -35.5, 750, 6, 0.23), (4.689, -24, 780, -3, 0.027),
          (4.766, -26.5, 850, -13, 0.047), (4.811, -11.5, 745, 0.5, 0.15), (4.821, -18, 670, 3, 0.19),
          (4.903, -42, 696, -5, 0.045), (4.954, -13, 780, 2.5, 0.11), (5.04, -14.5, 745, -1.5, 0.29),
          (5.089, -24, 750, 1, 0.039), (5.12, -23, 766, -5, 0.1), (5.131, -20.5, 791, -10, 0.061),
          (5.192, -25, 746, -21, 0.063), (5.223, -17, 980, -5, 0.045), (5.234, -16, 1590, -11, 0.017),
          (5.248, -16.5, 1054, -19, 0.019), (5.278, -19, 2050, -16, 0.03), (5.287, -19, 1010, -14, .03),
          (5.316, -18.5, 2050, -13, 0.031), (5.338, -26, 2100, -10, .02), (5.35, -6, 776, -3, 0.025),
          (5.376, -19, 1360, -3, 0.022), (5.387, -17, 1430, 4.5, 0.034), (5.424, -18.5, 1130, 0, 0.04),
          (5.439, -19, 1500, 6, 0.017), (5.448, -11.5, 670, -1, 0.07), (5.461, -17, 1090, -5, 0.035),
          (5.513, -24, 1100, -4, 0.014), (5.558, -20, 880, -13, 0.1), (5.588, -11.5, 770, 0.5, 0.027),
          (5.625, -24, 1010, -3, 0.024), (5.637, -24, 900, -8, .03), (5.645, -14, 1500, -7, 0.017),
          (5.669, -20.5, 750, -5, 0.03), (5.703, -25, 2100, -2, 0.027), (5.73, -25, 743, -12, 0.056),
          (5.759, -11, 824, -5, 0.041), (5.775, -13.5, 945, -5.5, 0.022), (5.787, -26, 1700, -15, 0.014),
          (5.875, -32.5, 1700, 13, 0.025), (5.892, -27, 1690, 14.5, 0.026), (5.92, -18, 945, 4.5, 0.025),
          (5.95, -22.5, 1010, -2, 0.045), (5.982, -9.5, 1670, 6.5, 0.054), (6.001, -13.5, 1500, 8, 0.014),
          (6.038, -11.5, 1660, 5, 0.034), (6.042, -13.5, 600, -20, .06), (6.073, -8, 2020, 6, 0.013),
          (6.095, -10, 1900, -5, 0.079), (6.133, -13.5, 2080, -14, 0.016), (6.124, -19, 950, -20, 0.037),
          (6.149, -6.5, 990, -2, 0.071), (6.165, -13, 980, 1, 0.047), (6.166, -13, 1720, -16, .03),
          (6.187, -4, 966, -4, 0.025), (6.206, -9.5, 1570, -24, 0.036), (6.228, -18, 1550, -10, 0.03),
          (6.243, -14, 890, -0.5, 0.077), (6.279, -12.5, 2050, -3, 0.055), (6.288, -3.5, 1010, -8, 0.032),
          (6.354, -18, 770, -1, 0.071), (6.414, -11.5, 1000, 6, 0.061), (6.451, -20, 1570, -8, 0.095),
          (6.462, -17, 1900, -9, 0.025), (6.48, -8.5, 1320, 5, 0.047), (6.514, -9, 940, 3, 0.076),
          (6.555, -18, 1410, -20, 0.05)]
# settings for the three parts: middle clack pitch [Hz], its random spread [share], ring width [share of pitch],
# level of a narrower note added to the ring [dB]
CLACK_HZ, CLACK_SPREAD = [1900, 2370, 2080], [0.075, 0.16, 0.067]
RING_WIDTH, RING_NOTE_DB = [0.65, 1, 1], [-1, 2, 4]


def knocks(count=7000):
    """One firm contact and a dying cluster of lighter ones set off a hollow ring and a clack."""
    out = np.zeros((2, N))
    times = np.array(KNOCKS)[:, 0]
    contacts = grains((len(KNOCKS), count), times[:, None], per_s=4000.0, spread_db=3.5, alike=0.043,
                      first=5.5)
    spread = of_part(CLACK_SPREAD, times) * rng.standard_normal(len(KNOCKS))
    pitches = of_part(CLACK_HZ, times) * np.exp(spread)
    motion_s, _, motion_pan_db = np.transpose(MOTION)
    for (s, db, hz, clack_db, t60), clack_hz, touch in zip(KNOCKS, pitches, contacts):
        touch = touch * blow(t60, rise_s=0.0016, tail_db=-11.5, stretch=4.24, count=count)
        # contact time dulls the top
        touch = signal.lfilter(*signal.butter(2, min(0.59 * clack_hz, 9000), fs=SR), touch)
        ring = resonance(resonance(touch, hz, 1.08 * hz), hz, of_part(RING_WIDTH, s) * hz)
        ring = ring + natural_amplitude(of_part(RING_NOTE_DB, s)) * resonance(ring, hz, .12 * hz)
        clack = resonance(resonance(touch, clack_hz, 1.47 * clack_hz), clack_hz, 33.0 * clack_hz)
        # a narrow note on a broad snap
        clack = resonance(clack, clack_hz, 0.21 * clack_hz) + natural_amplitude(-23.0) * clack
        knock = natural_amplitude(db - 3.5) * peak_one(ring) + natural_amplitude(db + clack_db - 9.5) * peak_one(clack)
        add(out, s - .0015, panned([np.interp(s, motion_s, motion_pan_db)]) * knock)
    return out


def scene():
    """Adds all sources at the two ears; drone, scuffing and rolling swell together in clumps."""
    clump = drift(36.0)
    moving = board_drone(clump) + scuffing(clump) + rolling(clump)
    return rumble() + moving + squeaks() + scrapes() + thuds() + cracks() + knocks()


def roll_off(x):
    """The treble ends steeply here."""
    return signal.sosfilt(signal.butter(12, 16620, fs=SR, output="sos"), x)


def record(dry):
    """The top is cut by a steep filter, then peaks are rounded."""
    dry = signal.sosfilt(signal.cheby2(12, 60, 16700, fs=SR, output="sos"), dry)
    mix = 1.159 * np.tanh(dry / 1.473)
    return roll_off(mix)


dry = scene()
out = record(dry)
master(out)
```